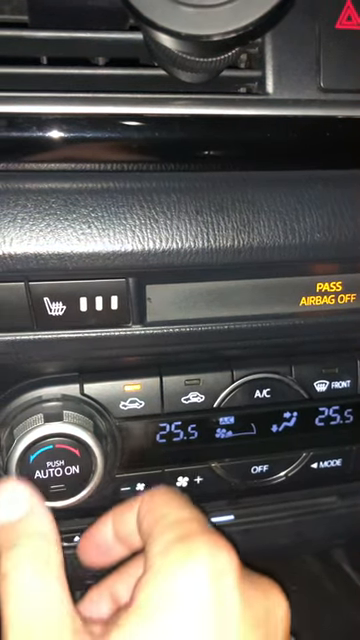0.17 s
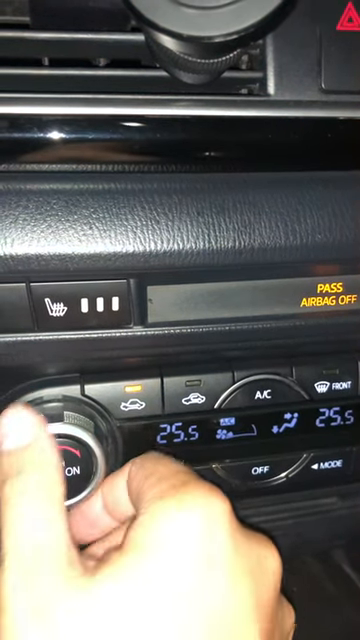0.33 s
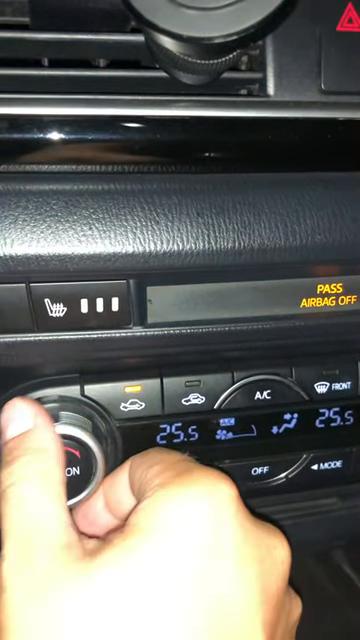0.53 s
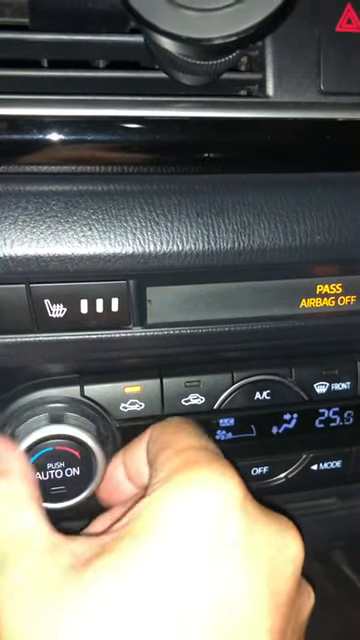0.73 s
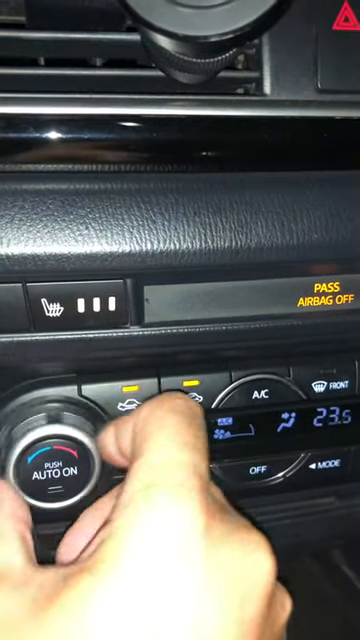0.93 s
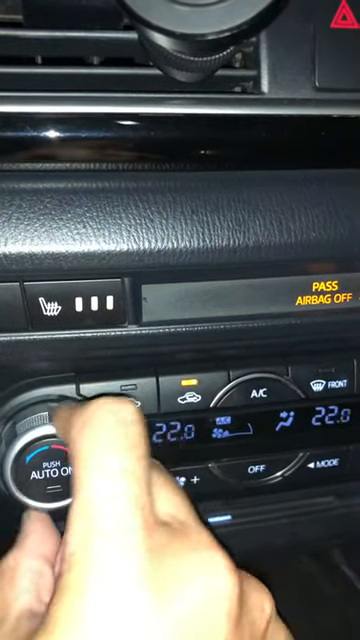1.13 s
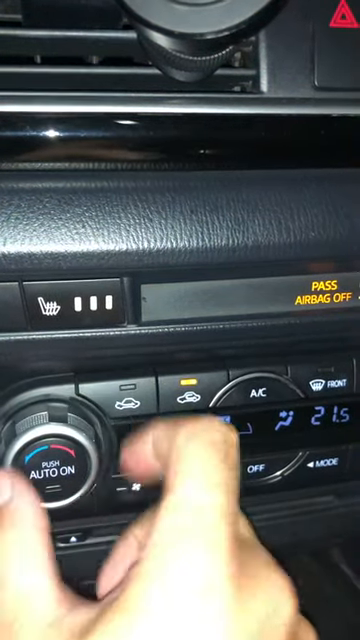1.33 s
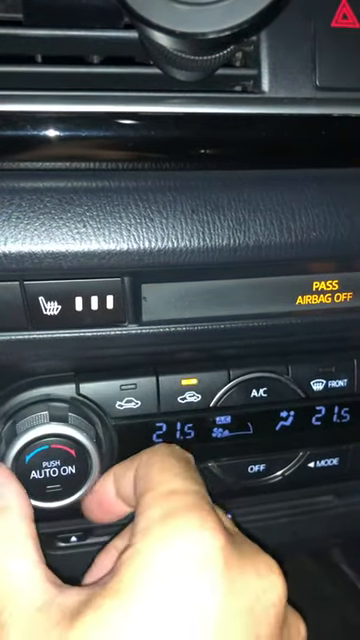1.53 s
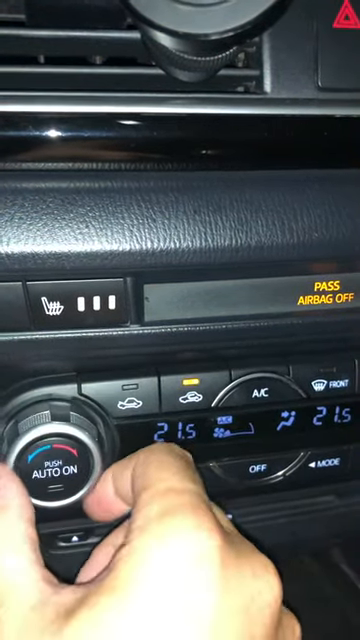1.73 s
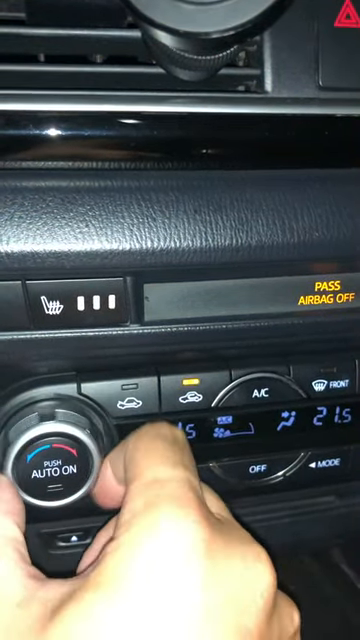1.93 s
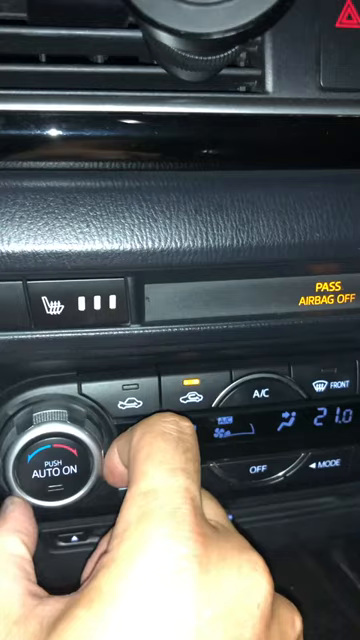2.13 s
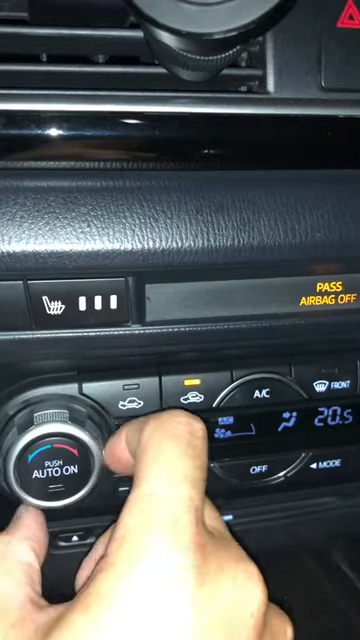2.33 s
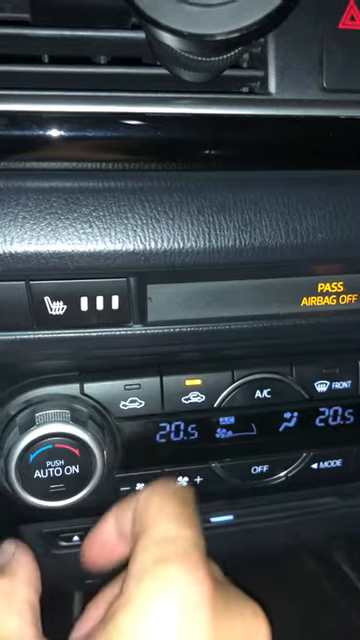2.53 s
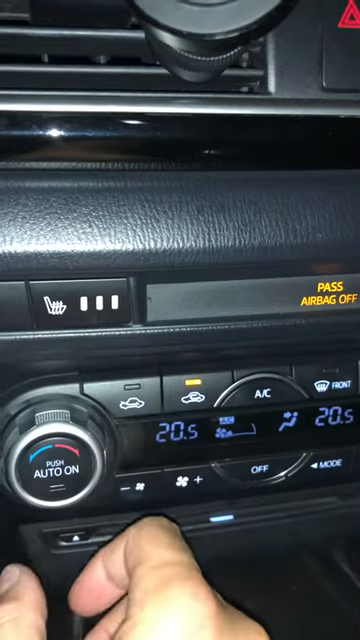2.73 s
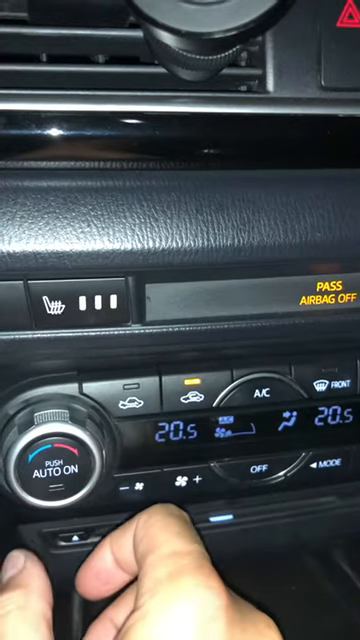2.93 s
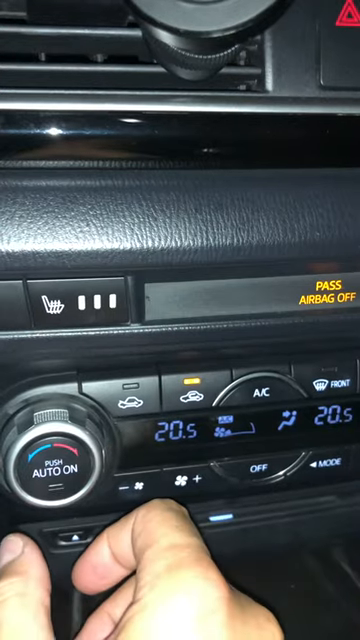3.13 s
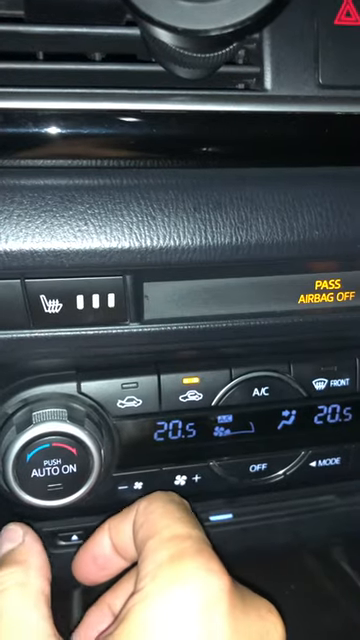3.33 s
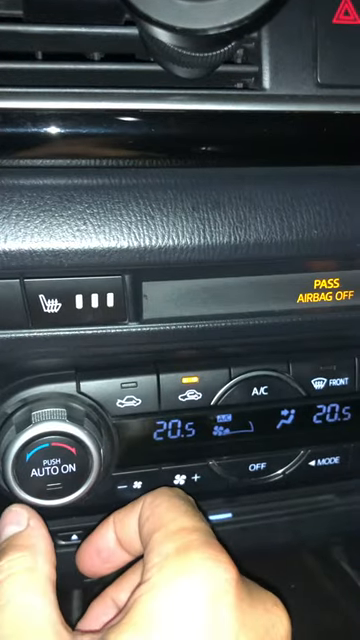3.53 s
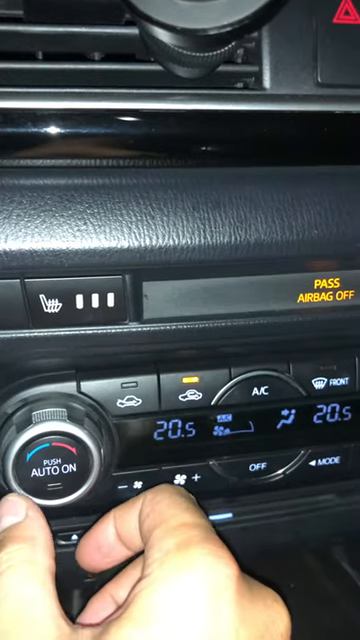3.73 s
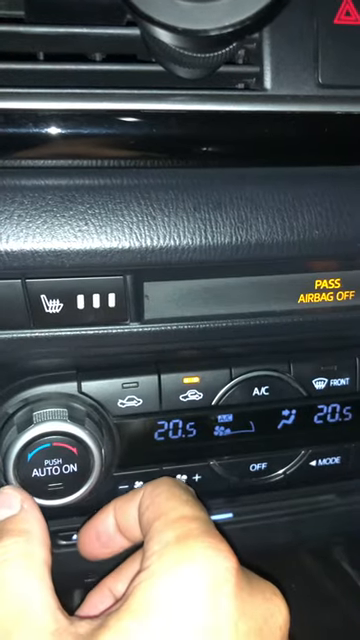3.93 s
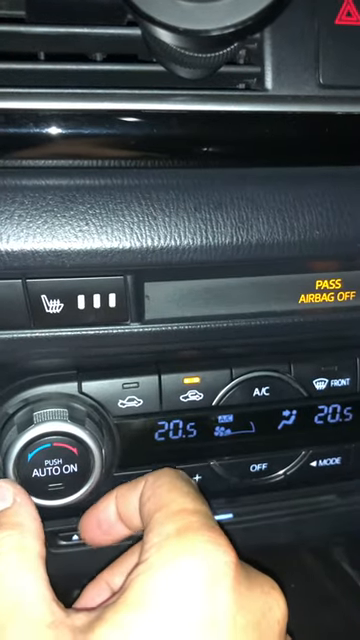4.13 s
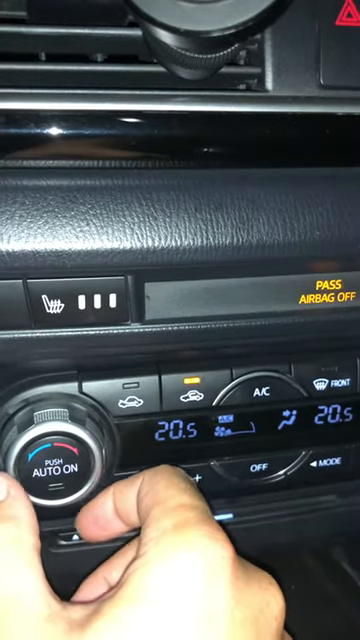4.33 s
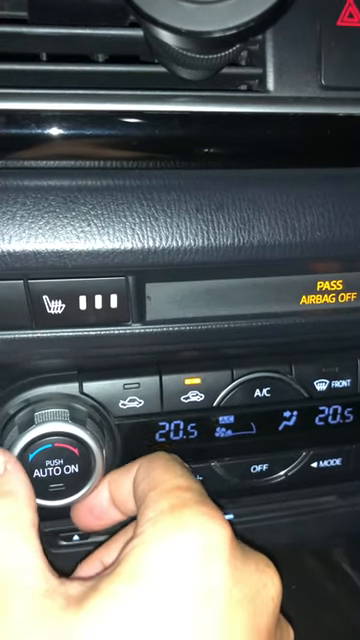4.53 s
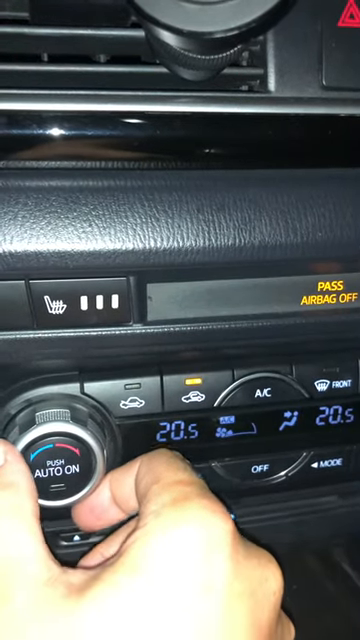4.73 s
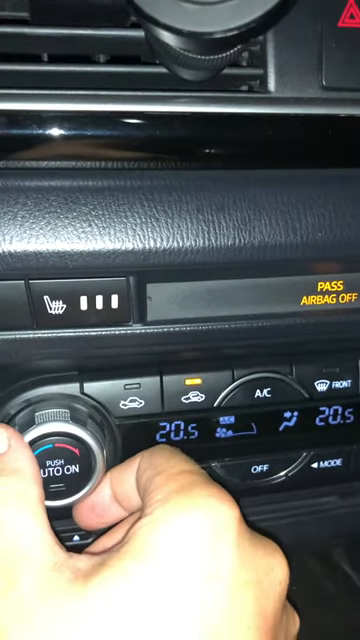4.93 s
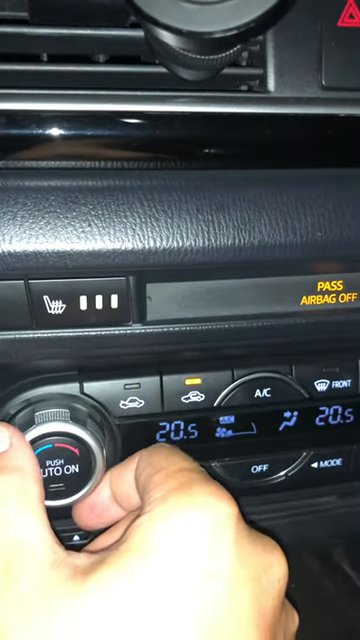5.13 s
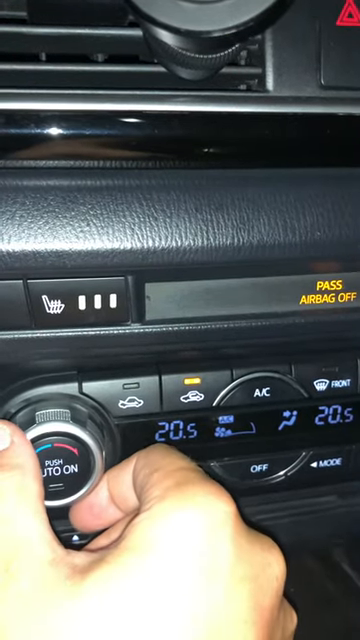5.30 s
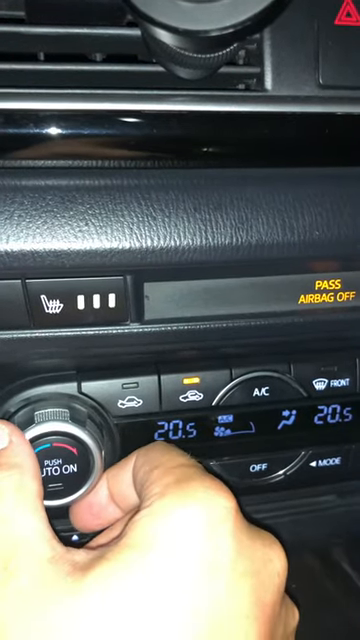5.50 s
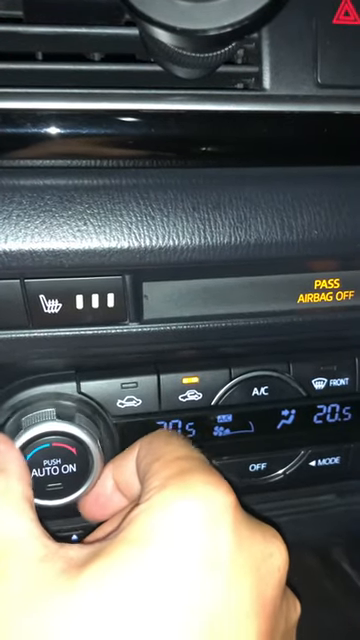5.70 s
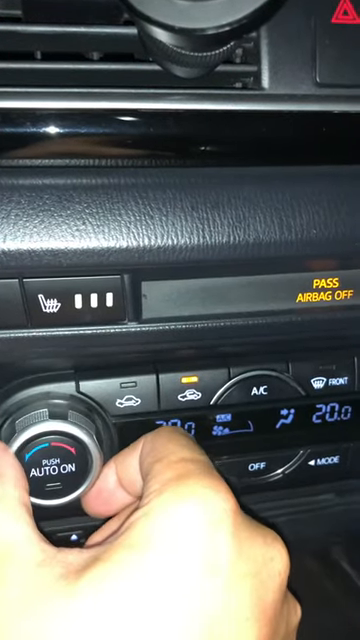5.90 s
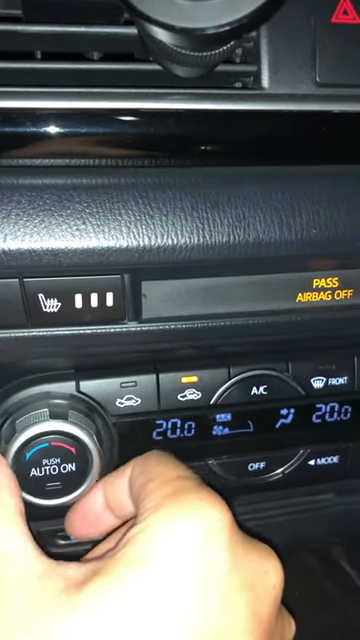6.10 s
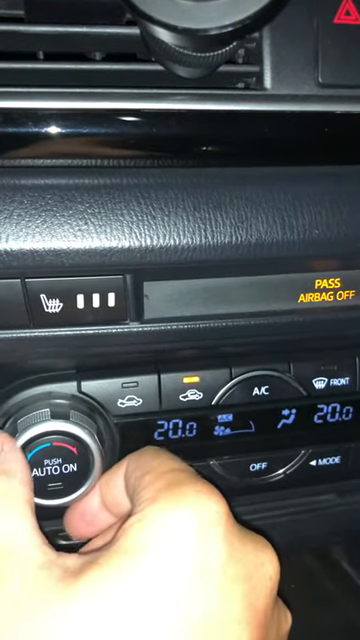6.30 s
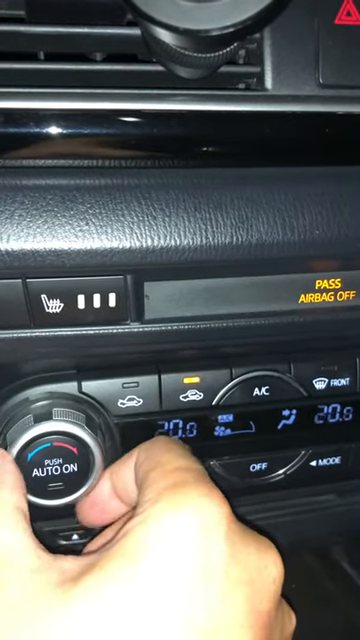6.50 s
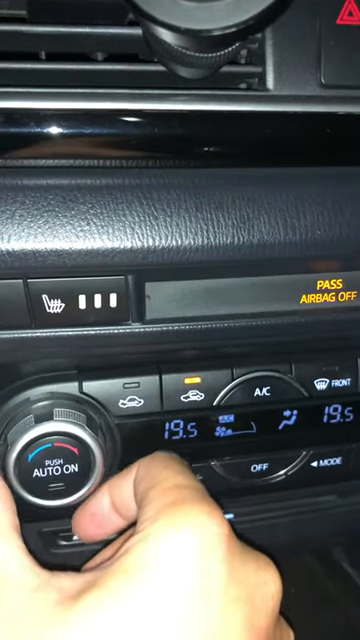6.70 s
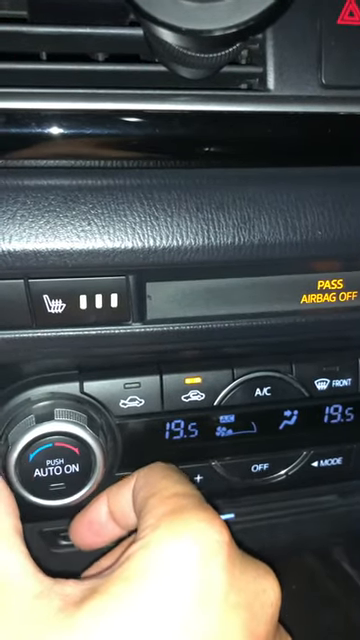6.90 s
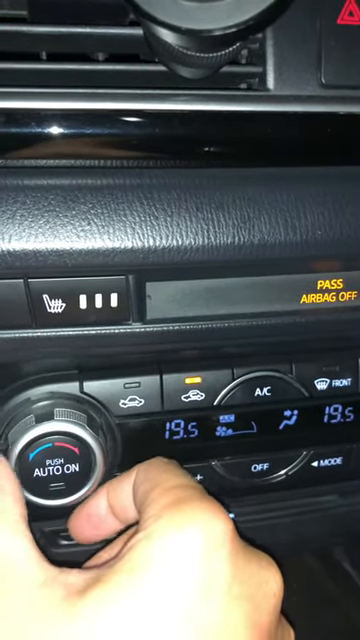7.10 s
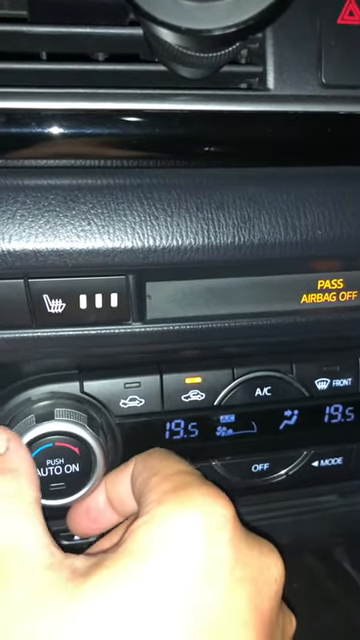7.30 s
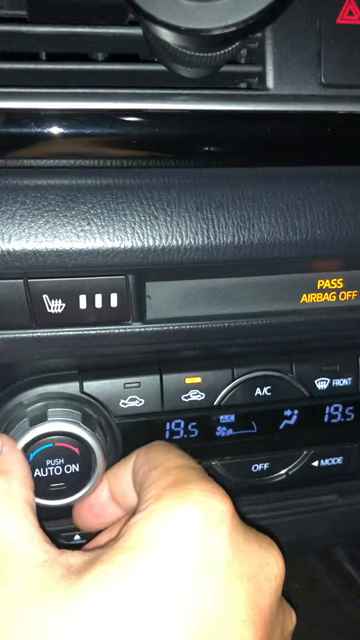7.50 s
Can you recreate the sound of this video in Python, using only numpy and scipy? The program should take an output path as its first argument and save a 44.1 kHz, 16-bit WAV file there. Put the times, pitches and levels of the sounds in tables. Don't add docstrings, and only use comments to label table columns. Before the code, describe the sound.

Quick bright ratchet clicks of a car climate knob with soft finger thumps, then sparse single clicks, over engine drone and a gentle fan rush.

```python
import sys
import numpy as np
from scipy import signal
from scipy.fft import rfft, irfft, next_fast_len
from scipy.io import wavfile
from scipy.ndimage import uniform_filter1d, map_coordinates

SR = 44100
rng = np.random.default_rng(int(sys.argv[2]) if len(sys.argv) > 2 else 0)


def gain_from_db(level_db):
    decades = np.asarray(level_db, float) / 20
    return 10 ** decades


def store_pcm(level_fs):
    pcm = np.round(np.clip(level_fs, -1, 1) * 32767).astype(np.int16)
    wavfile.write(sys.argv[1], SR, np.atleast_2d(pcm).T)


N = 332955

# frequency in Hz, level in dB per Hz.
SPRING_SPECTRUM = [(900, -34), (1500, -3), (2050, -4.5), (2400, -9.5), (3100, -12.5), (4100, -17.5),
                   (5500, -19), (7500, -20.5), (11400, -25.5), (13800, -25), (15700, -35), (15900, -90)]
# frequency in Hz, width in Hz, level in dB.
SPRING_MODES = [(2470, 210, -5), (3664, 140, 6), (3813, 180, 7), (4440, 240, 1.5), (6240, 180, 11),
                (6540, 100, -3), (6900, 62, 8.5), (8450, 350, 3), (9330, 130, 2), (10500, 410, 6.5),
                (12800, 500, -7), (13000, 250, -2)]


def unit(x):
    return x / np.sqrt(np.mean(x ** 2) + 1e-20)


def along(points, hz):
    f, v = np.transpose(points)
    return np.interp(np.log(hz + 1), np.log(f + 1), v)


def curves(rows):
    s, *cols = np.transpose(rows)
    return [np.interp(np.arange(N) / SR, s, c) for c in cols]


def wobble(rate_hz):
    knots = rng.standard_normal(int(N * rate_hz / SR) + 4)
    return map_coordinates(knots, [np.arange(N) * rate_hz / SR])


def filtered(x, response):
    m = next_fast_len(N + SR // 2)
    return irfft(rfft(x, m) * response(np.fft.rfftfreq(m, 1 / SR)), m)[:N]


def humps(peaks, hz):
    return np.sqrt(sum(gain_from_db(db) ** 2 / (1 + (2 * (hz - c) / w) ** 2) for c, w, db in peaks))


def ring(t, hz, t60_s, rise_s):
    t = np.maximum(t, 0)
    return np.sin(2 * np.pi * hz * t) * gain_from_db(-60 * t / t60_s) * (1 - np.exp(-t / rise_s))


def rush(response, patchy_db):
    z = signal.stft(rng.standard_normal(N + 1024), nperseg=512)[2]
    field = uniform_filter1d(rng.standard_normal(z.shape), size=6, axis=0)
    field = uniform_filter1d(field, size=12, axis=1)
    noise = signal.istft(z * gain_from_db(patchy_db * unit(field)), nperseg=512)[1][:N]
    return unit(filtered(noise, response))


def drone(hz, db, unsteady_db):
    phase = 2 * np.pi * (np.cumsum(hz * np.ones(N)) / SR + rng.random()) + 0.14 * wobble(6)
    return np.sqrt(2) * gain_from_db(db + unsteady_db * wobble(7)) * np.sin(phase)


def idle():
    # multiple of the idle rate, level in dB.
    orders = [(1, -77), (3, -55.5), (4, -73.5), (5, -61.5), (5.5, -65), (6, -59.5), (7, -70.5), (11, -78.5),
              (12, -70.5), (21, -76.5)]
    # time in seconds, engine load in dB.
    load = [
        (0, 3.5),
        (.5, 5.5),
        (1.4, 5.5),
        (1.9, 1.5),
        (2.5, 2.5),
        (3, 2.5),
        (5.6, 2.5),
        (6.0, -7),
        (7.55, -14),
    ]
    load_db, = curves(load)
    idle_hz = 23.48 * (1 + 0.0019 * wobble(1.525))
    second = drone(2 * idle_hz, -59.5 + 2.56 * load_db, 0.75)
    return second + sum(drone(k * idle_hz, db + load_db, 1.9) for k, db in orders)


def outside():
    # time in seconds, firing rate in Hz, level in dB.
    leaving = [(0, 49.84, -41), (.3, 54.64, -47), (.6, 55.06, -39), (.9, 59.16, -54.5), (1.2, 60.96, -45.5),
               (1.8, 58.37, -45), (2.0, 56.55, -47.5), (2.3, 52.7, -39), (2.7, 52.95, -49),
               (3.2, 55.36, -43), (3.42, 56.7, -54), (3.55, 56.9, -42), (4, 58.5, -40.5), (4.8, 61.87, -45),
               (6.2, 66.9, -43), (6.45, 65.13, -40.5), (7.2, 49.24, -38.5), (7.55, 47, -33.5)]
    waiting = [
        (0, 37.4, -54),
        (4, 36.9, -57),
        (5.3, 37.32, -64),
        (6.05, 44.56, -44),
        (6.7, 49.62, -48.5),
        (7.05, 51.3, -62),
        (7.55, 51.8, -58),
    ]
    passing = [
        (0, 84.55, -49.5),
        (0.6, 84.3, -45.5),
        (1.6, 85.2, -55),
        (2.2, 85.2, -68),
    ]
    octaves_db = [-30.5, -24, -13]
    out = np.zeros(N)
    for rows, octave_db in zip((leaving, waiting, passing), octaves_db):
        hz, db = curves(rows)
        out += drone(hz, db, 2.67) + drone(2 * hz, db + octave_db, 3.1)
    return out


def air():
    # time in seconds, nearness in dB.
    traffic = [(0, 1), (.15, 2.5), (.6, 2), (.9, 4.5), (1.15, 2), (1.5, -1), (2, 1.7), (2.6, -0.66),
               (4.3, 0), (6, 0.5), (6.5, -1.5), (7, 0.5), (7.55, 0)]
    # frequency in Hz, level in dB per Hz.
    road_spectrum = [(25, -27), (36, -7.5), (50, 7.5), (75, 5), (100, -2), (135, 1.5), (170, -4.5),
                     (240, -11.5), (400, -50.5)]
    blower_spectrum = [(120, -38.5), (180, -10), (260, -4), (420, -11), (520, -8), (1000, -16.5),
                       (1600, -22), (1750, -22.5), (2600, -37), (4000, -86)]
    hiss_spectrum = [(1300, -21), (1900, 2.5), (2850, -1.5), (3600, -2.5), (6000, -8), (11000, -14.5),
                     (15100, -25)]
    # duct resonance in Hz, width in Hz, level in dB.
    ducts = [(296, 106, 2.5), (479.5, 68, 3.5), (561, 40, 1), (642, 27, 1.5), (773, 34, 2.5), (871, 27, 10),
             (942, 44, 0.5), (1050, 95, 0.5), (1177, 52, 4), (1360, 60, -6), (1450, 34, 6), (1578, 56, 2.5)]
    near_db, = curves(traffic)
    gust = wobble(2.955)
    road = rush(lambda hz: gain_from_db(along(road_spectrum, hz)), patchy_db=2.0)
    blower = rush(lambda hz: gain_from_db(along(blower_spectrum, hz)) * (0.45 + humps(ducts, hz)), patchy_db=0.98)
    hiss = rush(lambda hz: gain_from_db(along(hiss_spectrum, hz)) * (hz < 15150), patchy_db=0.2)
    road_db = -52.5 + 0.99 * near_db + 1.7 * gust
    blower_db = -52.5 + 0.99 * near_db + 0.37 * gust + 0.78 * wobble(9)
    hiss_db = -73 + 0.18 * near_db
    return gain_from_db(road_db) * road + gain_from_db(blower_db) * blower + gain_from_db(hiss_db) * hiss


def fingers():
    # start in seconds, peak in dB, pitch in Hz, t60 in seconds.
    touches = [(0.112, -33, 220, 0.058), (.24, -32, 193, 0.065), (.35, -38, 235, 0.16),
               (0.479, -37, 172, 0.083), (.6, -38.5, 533, .12), (.66, -38, 276, .07),
               (.715, -35.5, 507, 0.056), (0.736, -33.5, 200, 0.1), (.855, -41, 527, 0.047),
               (.955, -34.5, 589, 0.069), (.95, -37.5, 306, 0.14), (0.959, -34.5, 228, 0.097),
               (.96, -41, 418, 0.061), (1.0, -34.5, 265, 0.22), (1.135, -42, 260, 0.097),
               (1.388, -45, 310, 0.14), (1.756, -43, 834, 0.047), (2.455, -61, 3470, 0.059),
               (2.455, -44, 802, 0.061), (3.36, -45.5, 395.5, 0.19), (5.541, -54, 2600, 0.025),
               (5.865, -45, 786, 0.031), (6.665, -59, 3430, 0.039), (6.91, -49, 1050, 0.035),
               (7.443, -46, 900, 0.031)]
    out, t = np.zeros(N + SR), np.arange(SR // 5) / SR
    chance = rng.random((len(touches), 2, 6))
    for (start_s, peak_db, hz, t60_s), (place, late) in zip(touches, chance):
        spread = 0.03 + 0.00617 / t60_s
        modes_hz = hz * (1 + spread * (np.arange(6) - 3 + place) * 0.54)
        cluster = sum(ring(t - 0.38 * k / f, f, t60_s, t60_s * 0.2) for f, k in zip(modes_hz, late))
        out[round(start_s * SR):][:len(t)] += gain_from_db(peak_db - 3.5) * cluster / np.abs(cluster).max()
    return out[:N]


def dial_knock(t):
    # frequency in Hz, signed size, t60 in seconds.
    parts = [(750, .0467, .0146), (860, -.0762, .0108), (1110, .008, .0196), (1590, .0257, .0366),
             (1820, -.0024, .065), (2130, .0084, .0106), (2600, -.0022, .0204), (3370, .0068, .007)]
    # delay in seconds, signed share.
    answers = [
        (0, 1),
        (.00127, -.86),
        (.00524, .31),
        (.00648, -.37),
        (.00956, .14),
    ]
    # frequency in Hz, level in dB, t60 in seconds, rise in seconds.
    panel = [(985, -61, 0.071, 0.0088), (1115, -58, 0.11, 0.0044), (1330, -50, 0.033, 0.0023),
             (3605, -51.5, 0.014, 0.00039), (4526, -60, 0.031, .001)]
    knock = sum(share * size * ring(t - lag_s, hz, t60_s, 0.00256)
                for lag_s, share in answers for hz, size, t60_s in parts)
    return knock + sum(gain_from_db(db) * ring(t, hz, t60_s, rise_s) for hz, db, t60_s, rise_s in panel)


def rattle_decay(t):
    # delay in seconds, level in dB.
    walls = [
        (0, -1.5),
        (.0052, -0.5),
        (0.011, -3.5),
        (0.017, -16),
    ]
    cracks = sum((t > lag_s) * gain_from_db(db - 60 * np.maximum(t - lag_s, 0) / 0.021) for lag_s, db in walls)
    tail = gain_from_db(-60 * t / 0.12)
    return (0.72 * cracks + 0.8 * tail) * (1 - np.exp(-t / 0.00094))


def spring_rings(t):
    return sum(gain_from_db(db + along(SPRING_SPECTRUM, hz) + rng.normal(0, 2.1)) * ring(t, hz, 0.056, 0.0026)
               for hz, _, db in SPRING_MODES)


def dial():
    # start in seconds, blow in dB, rebound delay in seconds, rebound in dB.
    detents = [(0.5591, 1, 0.0051, -52), (0.6516, 0, 0.0053, -45.5), (0.7144, 0.5, 0.0096, -47),
               (.7756, 0, 0.011, -54), (.8522, 0.5, 0.0098, -42), (0.9151, -0.5, 0.011, -45),
               (0.971, -0.5, 0.0023, -51), (1.0345, -2, 0.0037, -54), (1.1011, -1, 0.00635, -56),
               (1.9594, .5, 0.0082, -48), (2.1062, 1.5, 0.0097, -48), (5.771, 0, .012, -50),
               (6.4492, .5, 0.015, -62)]
    rattle_db = -56
    out, t = np.zeros(N + SR), np.arange(SR // 8) / SR
    span = len(t)
    knock, decay = dial_knock(t), rattle_decay(t)
    tick_decay = gain_from_db(rattle_db + 11.5 - 60 * t / 0.011) * (1 - np.exp(-t / 0.0014))
    spring = rush(lambda hz: gain_from_db(along(SPRING_SPECTRUM, hz)) * (1.6 + humps(SPRING_MODES, hz)), patchy_db=-1.0)
    same, fresh = spring[:span], spring[span:]
    for start_s, blow_db, lag_s, rebound_db in detents:
        at = round(start_s * SR)
        rebound_hz = min(9.45 / lag_s, 2060)
        rebound = 3.0 * gain_from_db(rebound_db) * ring(t - lag_s, rebound_hz, 0.014, 0.0002)
        rattle = gain_from_db(rattle_db) * decay * (0.79 * same + 0.77 * fresh[at:][:span])
        tick = tick_decay * np.diff(fresh[at + span:][:span + 1])
        rings = gain_from_db(rattle_db + 1.0) * spring_rings(t)
        out[at:][:span] += gain_from_db(blow_db) * knock + rebound + rattle + tick + rings
    return out[:N]


def scene():
    return (idle() + outside() + air() + fingers() + dial())[None]


def top_cut(x):
    return signal.sosfilt(signal.butter(12, 15710, fs=SR, output="sos"), x)


def record(dry):
    closing = np.sin(np.pi / 2 * np.clip(np.arange(N)[::-1] / (0.004 * SR), 0, 1))
    return top_cut(dry * closing ** 2)


dry = scene()
out = record(dry)
store_pcm(out)
```